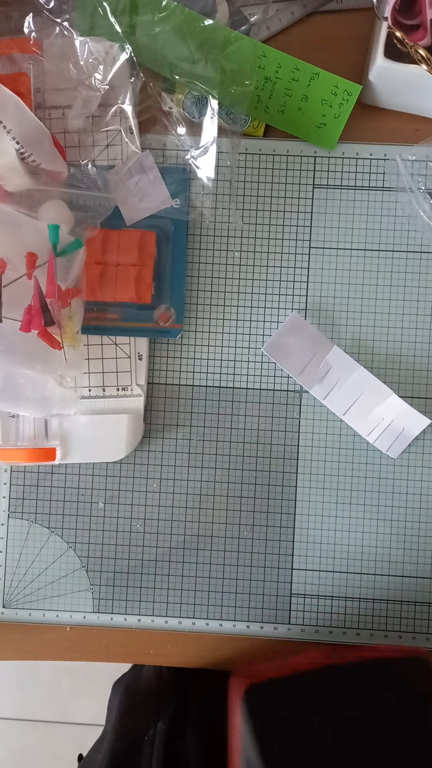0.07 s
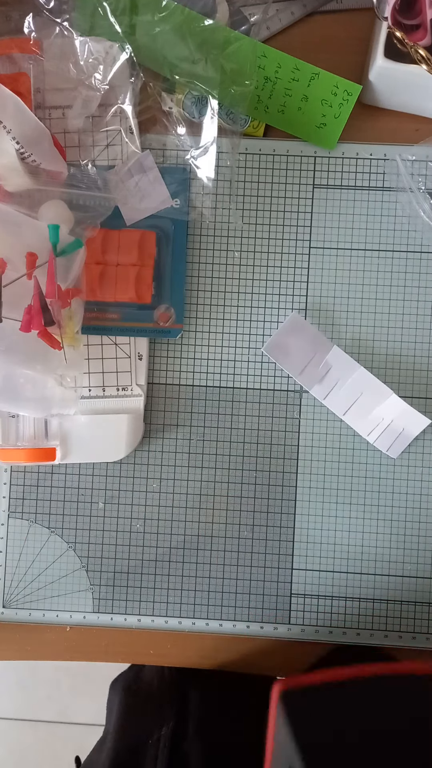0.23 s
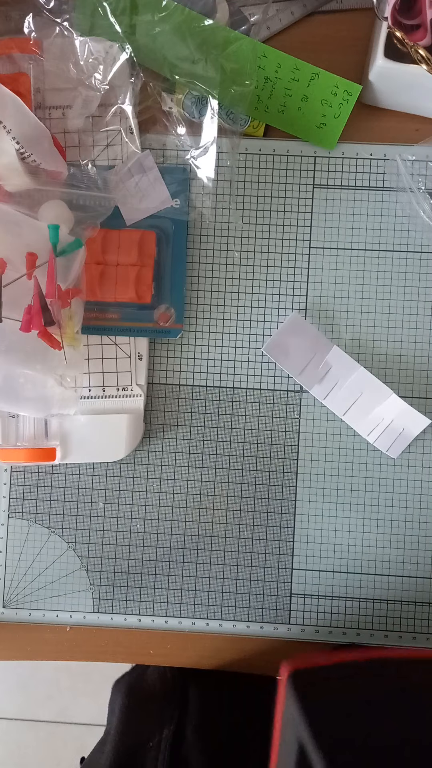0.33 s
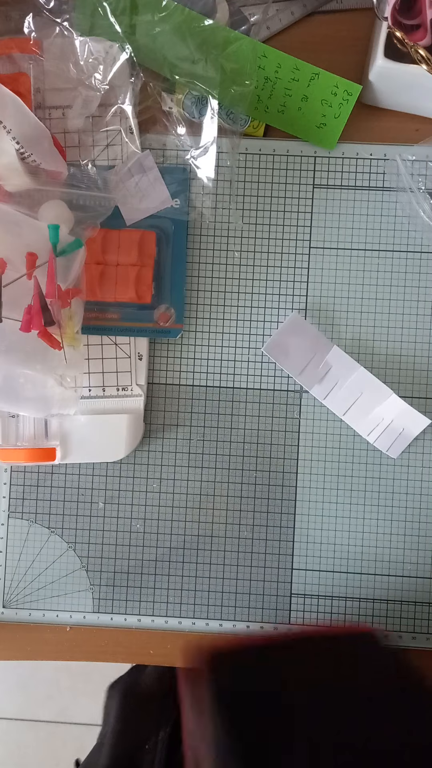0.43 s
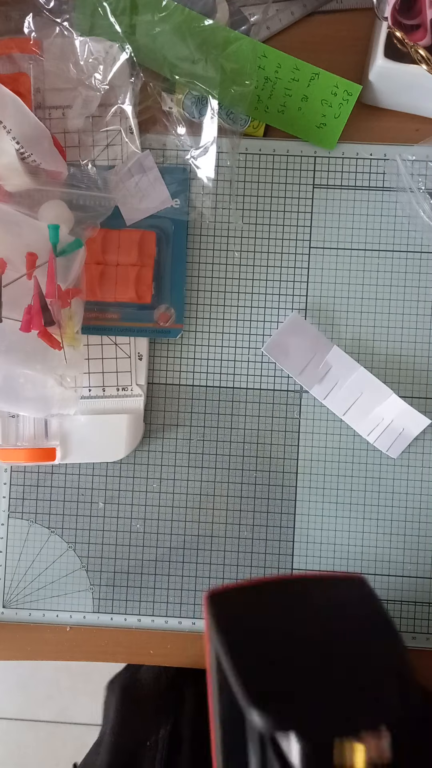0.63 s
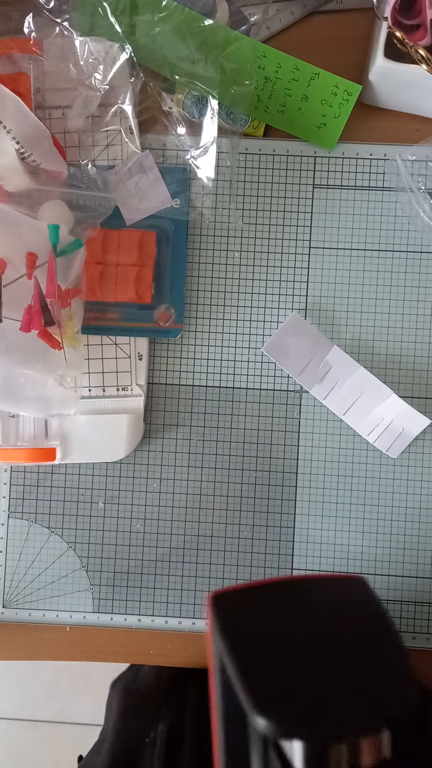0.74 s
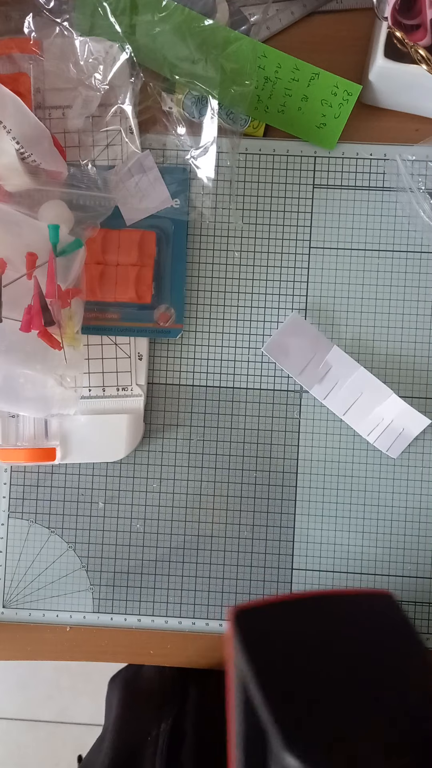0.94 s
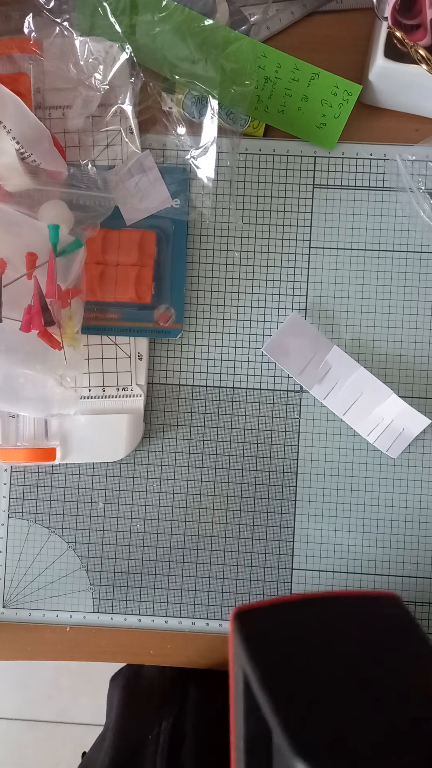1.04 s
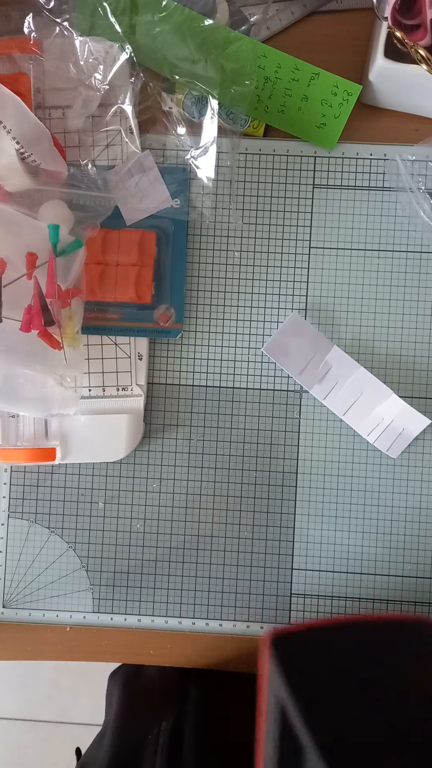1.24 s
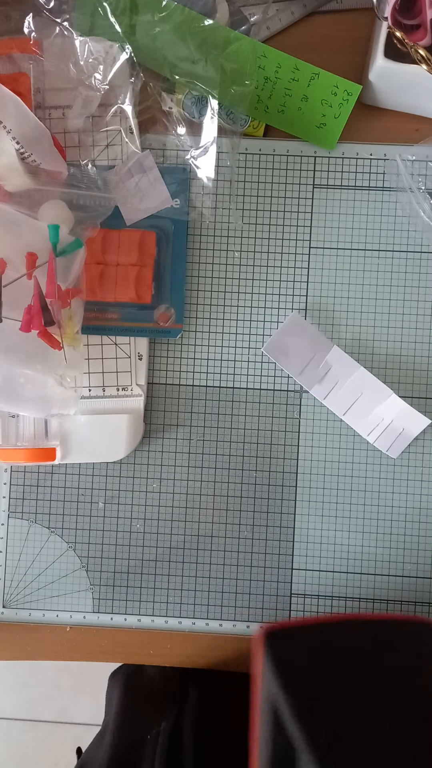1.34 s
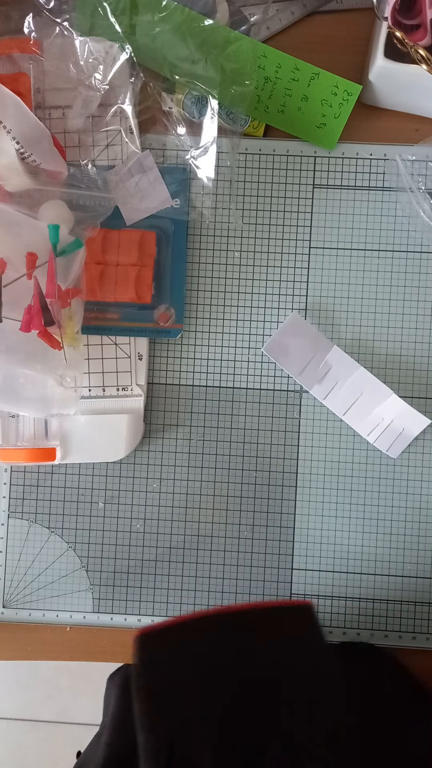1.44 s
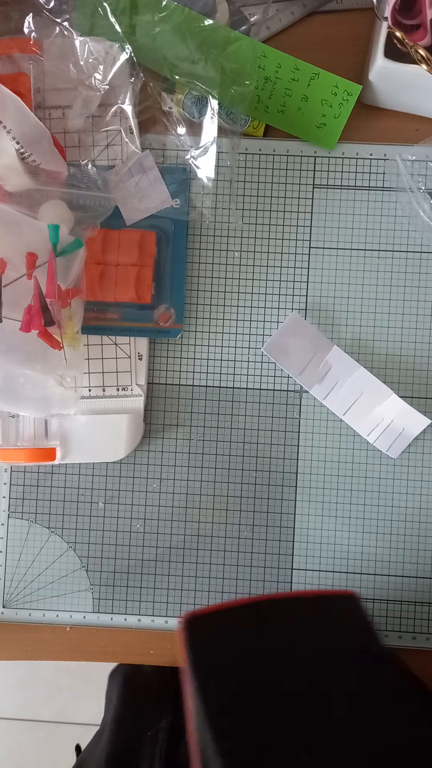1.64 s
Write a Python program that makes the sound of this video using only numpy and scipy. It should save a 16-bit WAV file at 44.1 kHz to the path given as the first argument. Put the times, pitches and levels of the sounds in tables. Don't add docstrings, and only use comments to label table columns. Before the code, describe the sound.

A scissor blade rasps through a plastic sharpener in two very short gritty strokes about a second apart, with clicks and dull thumps around each, recorded close in a small hard room over a faint low hum.

```python
import sys
import numpy as np
from scipy import signal
from scipy.fft import rfft, irfft
from scipy.io import wavfile
from scipy.ndimage import uniform_filter1d

SR = 44100
rng = np.random.default_rng(int(sys.argv[2]) if len(sys.argv) > 2 else 0)


def rack_gain(trim_db):
    fader = np.asarray(trim_db, float)
    return 10 ** (fader / 20)


def to_wav(s):
    ch = np.atleast_2d(s).T
    pcm = np.round(np.clip(ch, -1, 1) * 32767)
    wavfile.write(sys.argv[1], SR, pcm.astype(np.int16))


N = 74970

# frequency in Hz, level in dB per Hz.
ROOM_TONE = [(40, -33), (70, -2.5), (125, -8), (200, -12.5), (320, -13), (650, -22), (1500, -28),
             (8500, -52)]
# frequency in Hz, bandwidth in Hz, level in dB.
APPLIANCE_HUM = [(62, 12, -75), (125.7, 13, -51.5), (311.2, 12, -62.5), (400, 28, -62.5)]
# frequency in Hz, time to fall 60 dB in seconds.
ROOM_DECAY = [(200, 3.3), (800, 0.91), (2000, 0.477), (5000, .5), (8000, 0.3177), (14000, 0.42)]
# frequency in Hz, gain in dB.
ROOM_COLOUR = [(200, 1), (1000, -0.68), (3000, 0.32), (8000, 1), (16000, -0.68)]
# start in seconds, chatter decay in seconds.
CONTACTS = [(.2143, .008), (.2200, .0004), (.2225, .0015), (.2425, .0008), (.4298, .001), (.4485, .001),
            (.4590, .0005), (.4635, .0015), (.4720, .003), (1.0117, .0006), (1.0358, .0016), (1.0412, .002),
            (1.0872, .0011), (1.0928, .001), (1.262, .008), (1.2845, .01), (1.4268, .001), (1.432, .002),
            (1.4420, .0015), (1.6708, .0015), (1.6735, .003)]
# level in dB, steel over housing in dB, housing pitch in Hz.
CONTACT_SOUNDS = [(-31.5, 16, 4100), (-18, 7.5, 1560), (-26.5, -7, 1200), (-29.5, -11.5, 1800),
                  (-16.5, 9.5, 1500), (-27, 8, 1100), (-30.5, 25, 2500), (-26, 2, 4300), (-26, -10, 900),
                  (-18.5, -11, 1270), (-13.5, -1, 1160), (-17, -13, 1120), (-18, 12, 1100),
                  (-17, 0.5, 1400), (-49.5, 11.5, 1800), (-33.5, -6, 1330), (-22, 5, 1200), (-28, 2, 1800),
                  (-13.5, -11, 3800), (-16, -13, 1190), (-28, 6, 870)]
# start in seconds, level in dB, pitch in Hz, bandwidth in Hz.
THUMPS = [(.221, -26.5, 400, 200), (.465, -25.5, 248, 88), (1.089, -19.5, 312, 250), (1.426, -36, 297, 88),
          (1.442, -35, 400, 122), (1.673, -22, 500, 250)]
# frequency in Hz, bandwidth in Hz, level in dB.
HOUSING = [(280, 30, -16), (400, 48, -11), (605, 165, -9), (858, 280, -3.5), (1188, 174, -4),
           (1734, 228, 2), (1952, 328, 3.5), (2590, 510, 5), (3065, 820, -3.5), (4300, 800, -2)]
# frequency in Hz, bandwidth in Hz, level in dB.
STRUCK_STEEL = [(6170, 1200, -9), (7500, 1180, 2.5), (8460, 1800, -3.5), (11660, 2370, 0),
                (14200, 2500, -32)]
# time in seconds, level in dB, bite into the steel in dB.
PULL_1 = [(.362, -42, -22), (.372, -29.5, -13), (.396, -21.5, -8.5), (.410, -25, 7), (.420, -21.5, 7.5),
          (.425, -24, -5.5), (.432, -21.5, 0.5), (.462, -21.5, -1), (.470, -45, -3.5)]
# time in seconds, level in dB, bite into the steel in dB.
PULL_2 = [(1.313, -35, -15), (1.316, -31.5, -21), (1.345, -29.5, -11), (1.365, -21.5, -3.5),
          (1.385, -28, 2), (1.395, -21.5, -19), (1.408, -23.5, -3.5), (1.422, -26.5, 3), (1.446, -37, -17)]
# frequency in Hz, bandwidth in Hz, level in dB.
STEEL_1 = [(4730, 77, -4.5), (5290, 120, -4.5), (6840, 140, -8), (6640, 140, -10), (7370, 110, -1.5),
           (7680, 225, 1.5), (7886, 225, 9), (8370, 440, 5.5), (8430, 370, 0.5), (12400, 490, -6),
           (12500, 250, -29), (13200, 730, -5.5)]
# frequency in Hz, bandwidth in Hz, level in dB.
STEEL_2 = [(4080, 680, -9), (6200, 190, -7), (6900, 88, -24.5), (8160, 120, -4), (10270, 200, -10),
           (10700, 330, -4), (11900, 300, -10), (11570, 250, 0), (12800, 130, -16), (13030, 620, 1.5),
           (14700, 770, 2)]
# frequency in Hz, gain in dB.
GRIT_1 = [(300, -33), (1500, -27), (3500, -20), (5500, -21.5), (8000, -24.5), (10500, -15), (13000, -15.5),
          (16000, -16.5)]
# frequency in Hz, gain in dB.
GRIT_2 = [(300, -42), (1500, -7.5), (3500, -17.5), (5500, -11.5), (8000, -2.5), (10500, -2), (12500, 1.5),
          (16000, -21)]
# frequency in Hz, gain in dB.
LEFT_PORT = [(300, 0), (2500, 1.5), (5500, 0), (7600, 5), (8600, 0), (10000, -9), (11800, -4), (14500, -2)]
# time in seconds, gain in dB.
GAIN_RIDE = [(0, 0.5), (1.001, 0), (1.3, -2.5), (1.5, 1.5), (1.7, -5.5)]


def unit(x):
    return x / np.sqrt(np.mean(x ** 2) + 1e-30)


def peak(x):
    return x / np.abs(x).max()


def curve(points, hz):
    p = np.array(points, float)
    return np.interp(np.log(hz + 1), np.log(p[:, 0]), p[:, 1])


def colour(x, points):
    gain_db = curve(points, np.arange(2049) * SR / 4096)
    cepstrum = irfft(np.log(rack_gain(gain_db)))
    cepstrum[1:2048] *= 2
    cepstrum[2049:] = 0
    response = irfft(np.exp(rfft(cepstrum)))[:2048]
    return signal.fftconvolve(x, response)[:len(x)]


def ring(x, modes):
    out = 0
    for k, (hz, width, db) in enumerate(modes):
        b, a = signal.iirpeak(hz, hz / width, SR)
        out = out + (-1) ** k * rack_gain(db) * signal.lfilter(b, a, x)
    return out


def walk(rate, n):
    hold = max(int(SR / rate), 2)
    steps = np.repeat(rng.standard_normal(n // 20), hold)[:n]
    return unit(uniform_filter1d(steps, hold))


def air():
    hiss = (13600, 4300, -64.5)  # Hz, width Hz, dB
    alike = .22

    def one():
        tones = 0
        for hz, width, db in APPLIANCE_HUM + [hiss]:
            tones = tones + rack_gain(db) * unit(ring(rng.standard_normal(N), [(hz, width, 0)]))
        level = rack_gain(-49.5 + .8 * walk(8.08, N))
        return level * unit(colour(rng.standard_normal(N), ROOM_TONE)) + tones

    mid = one()
    side = one()
    return mid + np.sqrt((1 - alike) / (1 + alike)) * side * np.array([[1], [-1]])


def room(x):
    room_db, onset_s, early_db, early_s = -6, .002, -.5, .01
    t = np.arange(SR) / SR
    out = []
    for _ in range(2):
        f, frame_s, z = signal.stft(rng.standard_normal(SR), SR, nperseg=256)
        decay = rack_gain(-60 * frame_s / curve(ROOM_DECAY, f)[:, None])
        tail = signal.istft(z * decay, SR, nperseg=256)[1][:SR]
        tail = tail * (t > onset_s) * rack_gain(early_db * np.exp(-t / early_s))
        tail = colour(tail / np.sqrt(np.sum(tail ** 2)), ROOM_COLOUR)
        out.append(signal.fftconvolve(x, tail)[:len(x)])
    return rack_gain(room_db) * np.array(out)


def knocks():
    regrip_s = .8
    focus_db_per_oct2, spread_floor_db = -9, -12
    out, t = np.zeros(N + 3000), np.arange(3000) / SR
    chance = rng.standard_normal((len(CONTACT_SOUNDS), 3000))
    gripped = [(hz, 4 * width, db) for hz, width, db in STEEL_1]
    for (s, length), (db, steel_db, pitch), noise in zip(CONTACTS, CONTACT_SOUNDS, chance):
        push = noise * np.exp(-t / length) + 4 * (t == 0)
        shell = []
        for hz, width, mode_db in HOUSING[2:]:
            focus = max(focus_db_per_oct2 * np.log2(hz / pitch) ** 2, spread_floor_db)
            shell.append((hz, 1.4 * width, mode_db + focus))
        blade = gripped if s < regrip_s else STRUCK_STEEL
        steel = peak(ring(push, blade) + .3 * push)
        i = int(s * SR)
        out[i:i + len(t)] += rack_gain(db) * (peak(ring(push, shell)) + rack_gain(steel_db) * steel)
    for s, db, hz, width in THUMPS:
        i = int(s * SR)
        out[i:i + len(t)] += rack_gain(db) * np.sin(2 * np.pi * hz * t) * np.exp(-np.pi * width * t)
    return out[:N]


def patchy(x, modes):
    patch_db, patch_hz = 4, 90
    return sum(ring(x * rack_gain(patch_db * walk(patch_hz, N)), [mode]) for mode in modes)


def stroke(pull, steel, grit, ring_db, scrape_db, housing_db, rumble_db):
    grains_per_s, grain_spread_db, judder_db, judder_hz = 14000, 1.7, 1.7, 300
    hit = rng.random(N) < grains_per_s / SR
    grains = unit(hit * rng.standard_normal(N) * rack_gain(grain_spread_db * rng.exponential(size=N)))
    grains = unit(grains * rack_gain(judder_db * walk(judder_hz, N)))

    t, p = np.arange(N) / SR, np.array(pull, float)
    push = rack_gain(np.interp(t, p[:, 0], p[:, 1], left=-120, right=-120))
    bite = rack_gain(np.interp(t, p[:, 0], p[:, 2]))

    def part(body, gain):
        return body(grains * gain) / np.std(body(grains))

    blade = part(lambda v: patchy(v, steel), push * bite)
    scrape = part(lambda v: colour(v, grit), push * np.sqrt(bite))
    housing = part(lambda v: patchy(v, HOUSING[4:]), push)
    rumble = part(lambda v: ring(v, HOUSING[:2]), push)
    return (rack_gain(ring_db) * blade + rack_gain(scrape_db) * scrape
            + rack_gain(housing_db) * housing + rack_gain(rumble_db) * rumble)


def near(x, db):
    decay_s, bounces_per_s = .003, 9000
    t = np.arange(int(3 * decay_s * SR)) / SR
    hit = rng.random(len(t)) < bounces_per_s / SR
    taps = hit * rng.standard_normal(len(t)) * np.exp(-t / decay_s) * (t > 0)
    h = rack_gain(db) * taps / np.sqrt(np.sum(taps ** 2)) + (t == 0)
    return signal.fftconvolve(x, h / np.sqrt(np.sum(h ** 2)))[:N]


def scene():
    first = stroke(PULL_1, STEEL_1, GRIT_1, ring_db=-1, scrape_db=-2.5, housing_db=-10.5, rumble_db=-31)
    second = stroke(PULL_2, STEEL_2, GRIT_2, ring_db=-2.5, scrape_db=0, housing_db=-5.5, rumble_db=-18.5)
    direct = first + second + knocks()

    left_db, left_lag_s = -5.5, .00016
    f = np.fft.rfftfreq(N, 1 / SR)
    left = irfft(rfft(direct) * rack_gain(left_db) * np.exp(-2j * np.pi * f * left_lag_s), N)

    lead = int((PULL_1[-1][0] + .25) * SR)
    earlier = rack_gain(-10.5) * 10 * first[:lead]
    wet = room(np.concatenate([earlier, direct]))[:, lead:]
    return rack_gain(4) * np.array([near(left, -2), near(direct, -11)]) + wet + air()


def roll_off(x):
    return signal.sosfilt(signal.butter(12, 16960, fs=SR, output="sos"), x)


def record(dry):
    top_hz, bottom_hz = 15720, 62
    ride = np.array(GAIN_RIDE, float)
    gain = rack_gain(np.interp(np.arange(N) / SR, ride[:, 0], ride[:, 1]))
    x = np.array([colour(dry[0], LEFT_PORT), dry[1]]) * gain
    x = signal.sosfilt(signal.ellip(12, .3, 70, top_hz, fs=SR, output="sos"), x)
    x = signal.sosfilt(signal.butter(3, bottom_hz, "high", fs=SR, output="sos"), x)
    return roll_off(x)


dry = scene()
out = record(dry)
to_wav(out)
```